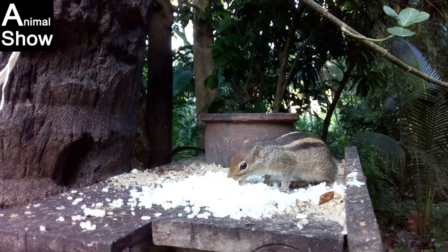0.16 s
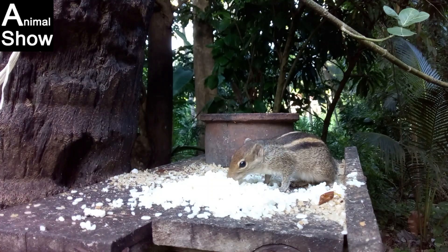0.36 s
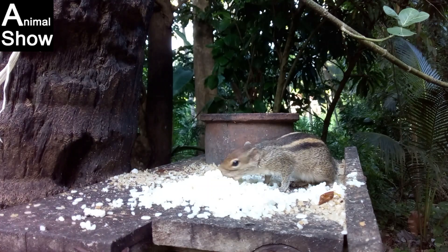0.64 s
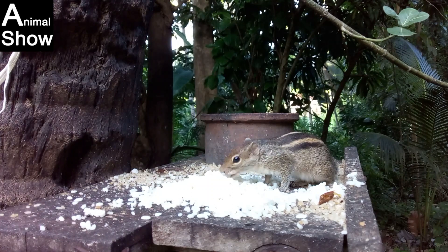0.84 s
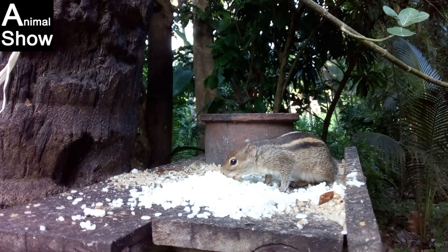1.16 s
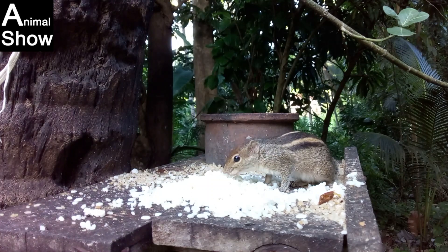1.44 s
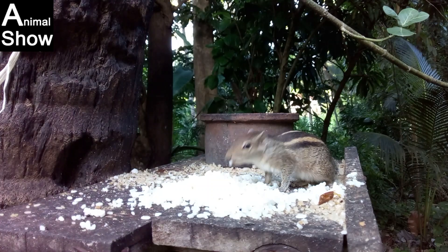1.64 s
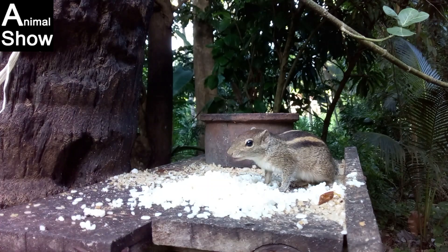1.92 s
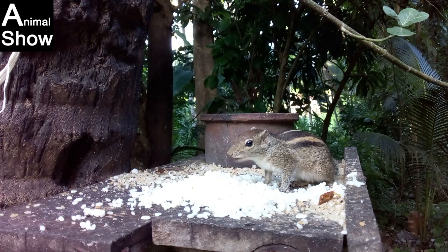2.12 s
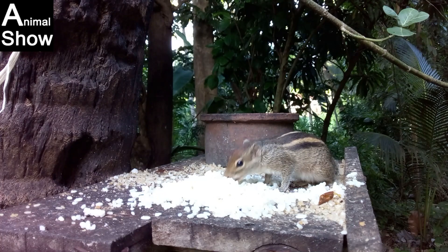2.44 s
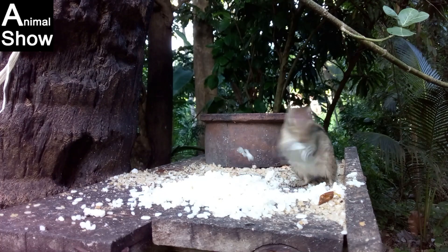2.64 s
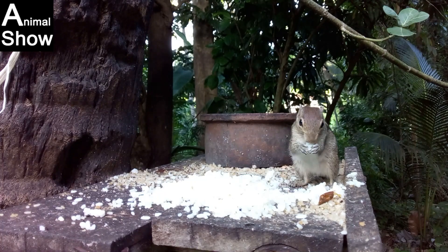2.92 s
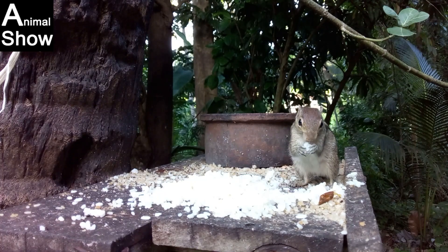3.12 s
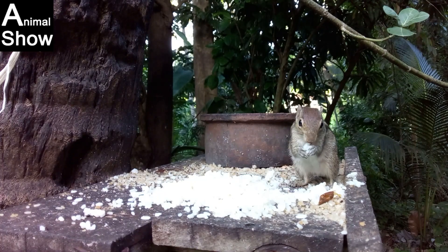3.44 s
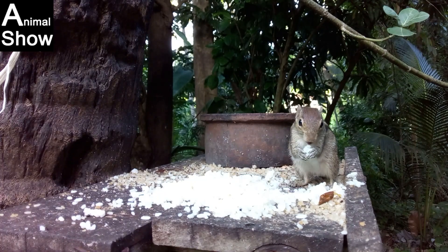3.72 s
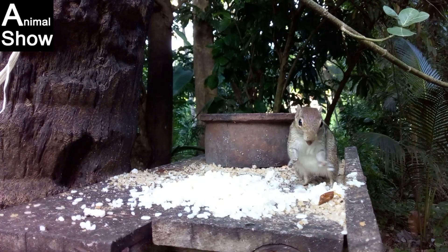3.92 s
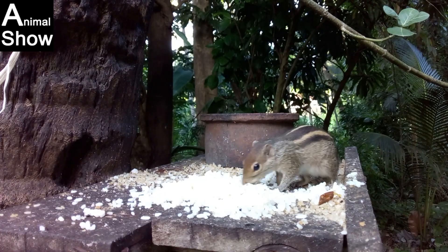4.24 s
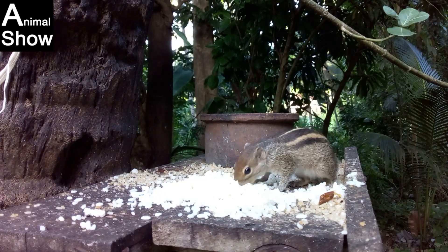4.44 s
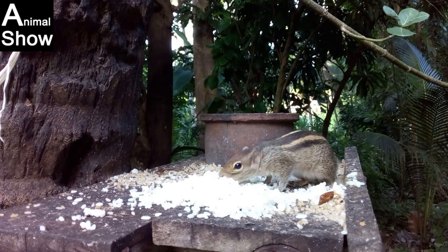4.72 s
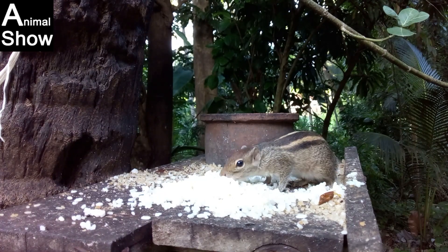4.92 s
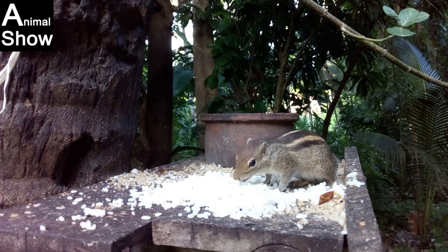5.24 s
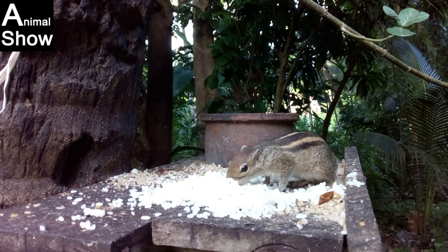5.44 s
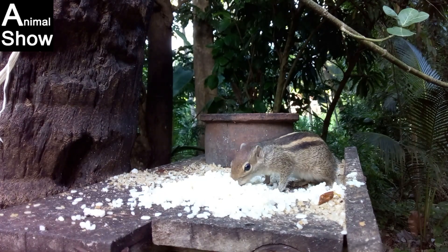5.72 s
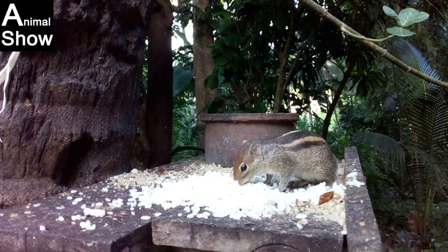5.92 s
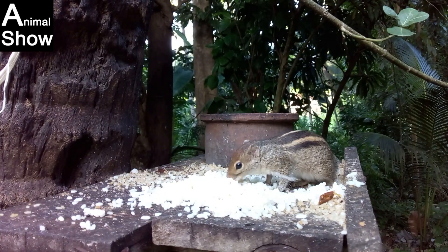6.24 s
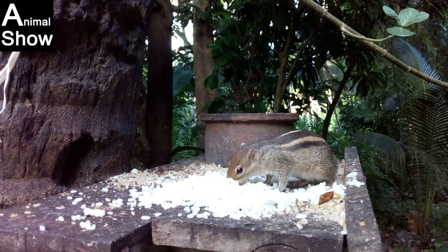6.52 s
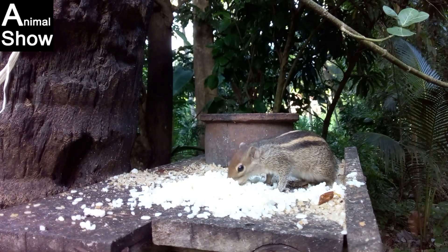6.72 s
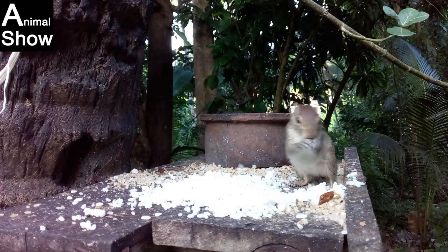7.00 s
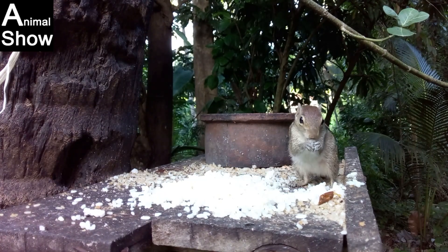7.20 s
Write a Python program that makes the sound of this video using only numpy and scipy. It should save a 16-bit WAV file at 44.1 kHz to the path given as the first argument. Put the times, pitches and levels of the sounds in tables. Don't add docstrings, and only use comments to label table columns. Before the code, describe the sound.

A small squirrel gives sixteen sharp, high chirps at slightly uneven intervals, two or three a second. Each flicks upward roughly into a short clear tone and scatters off ground, trunks and walls. Faint insect shrill, leaf hiss and distant traffic rumble stay underneath. Later come a few tiny claw ticks, weak far bird whistles and, at the end, a hoarse rising bird call. One steady outdoor microphone.

```python
import sys
import numpy as np
from scipy import signal
from scipy.fft import rfft, irfft, next_fast_len
from scipy.io import wavfile
from scipy.ndimage import map_coordinates

SR = 44100
rng = np.random.default_rng(int(sys.argv[2]) if len(sys.argv) > 2 else 0)


def unload_wav(signal):
    wavfile.write(
        sys.argv[1],
        SR,
        np.round(np.clip(np.atleast_2d(signal).T, -1, 1) * 32767).astype(np.int16),
    )


def amplitude_ratio(level_db):
    exponent = np.asarray(level_db, float) / 20
    return 10 ** exponent


N = 325015

# time the tone locks in seconds, pitch in Hz, strength in dB,
# extra level of the second partial in dB, strength of the echoes in dB.
CHIRPS = [(0.148, 2584, 2.7, 2, 0), (0.4806, 2579, 3, 2.8, -0.5), (0.78, 2580, 3, 2, .7),
          (1.0675, 2579, 2.5, 3.4, 0.5), (1.4191, 2585, 3, 2, -0.5), (1.7965, 2577, 2, 1.5, 0),
          (2.2395, 2575, 1, 1.8, 0.4), (2.7876, 2576, 2, -1, -0.5), (3.231, 2571, 1.5, 1.3, -0.7),
          (3.9306, 2573, 1, 1.5, -1.1), (4.3012, 2570, 2, 3.5, -1), (4.6728, 2579, 3, 2, 2.1),
          (5.0791, 2572, 2, 2.5, 1), (5.6631, 2577, 2.6, 1.7, 0.9), (6.2712, 2576, 2, 2, -1.5),
          (6.6388, 2576, 2, 2, 0.7)]
# time from the lock in seconds, pitch in Hz, level in dB.
GLIDE = [(-.02, 895, -74), (-.012, 1103, -57), (-.0085, 1703, -41), (-.006, 1851, -47),
         (-.002, 1940, -41.5), (0, 2579, -37.5), (.003, 2570, -52.5)]
HELD_START_S = -.0015
NEAR_T60_S = .24


def at_hz(points, hz):
    point_hz, point_db = np.array(points).T
    return np.interp(np.log(hz), np.log(point_hz), point_db)


def rms_one(x):
    return x / np.sqrt(np.mean(x ** 2) + 1e-20)


def filtered(x, order, hz, kind="low"):
    return signal.sosfilt(signal.butter(order, hz, kind, fs=SR, output="sos"), x)


def coloured(points):
    size = next_fast_len(N)
    hz = np.maximum(np.arange(size // 2 + 1) * SR / size, 1)
    spectrum = rfft(rng.standard_normal(size)) * amplitude_ratio(at_hz(points, hz))
    return rms_one(irfft(spectrum, size)[:N])


def drift(rate, size):
    points = rng.standard_normal(int(size / SR * 400) + 9)
    return map_coordinates(points, [np.arange(size) * min(rate, 399) / SR], order=3)


def add(out, x, s):
    i = round(s * SR)
    a, b = max(i, 0), min(i + len(x), N)
    out[a:b] += x[a - i:b - i]


def scatter(t60, start_s, length_s):
    t = np.arange(round(length_s * SR)) / SR
    onset = np.clip((t - start_s) / 0.0017 / (1 + 20 * start_s), 0, 1)
    tail = rng.standard_normal(len(t)) * amplitude_ratio(-60 * t / t60) * onset
    tail = signal.lfilter([1], [1, -.4], tail)
    return tail / np.sqrt(np.sum(tail ** 2))


def echoed(x, t60, start_s, length_s):
    return signal.fftconvolve(x, scatter(t60, start_s, length_s))[:len(x)]


def squirrel():
    earlier_chirp = (-.25, 2578, 0, 0, -.5)
    glides, tones, direct = np.zeros((3, N + SR))
    lead = SR // 2
    call = SR // 30
    for s, hz, *levels_db in [earlier_chirp] + CHIRPS:
        rise = amplitude_ratio(levels_db[0]) * glide()
        tone = held(hz, *levels_db)
        i = lead + round((s + GLIDE[0][0]) * SR)
        j = lead + round((s + HELD_START_S) * SR)
        glides[i:i + len(rise)] += rise
        tones[j:j + len(tone)] += tone
        direct[j:j + call] += tone[:call] * signal.windows.tukey(call)
    glides = filtered(glides, 8, 1760, "high")
    highs = amplitude_ratio(-7) * filtered(direct, 8, 7000, "high")
    near = amplitude_ratio(-1.5) * echoed(glides + highs, NEAR_T60_S, 0.0049, 1 / 2)
    uneven = direct * amplitude_ratio(4 * drift(120, size=N + SR))
    far = amplitude_ratio(-30) * echoed(glides + uneven, 1.1, .235, 1)
    far = filtered(far, 1, 3000)
    rasp = amplitude_ratio(-31) * direct * rng.standard_normal(len(direct))
    rasp = filtered(rasp, 2, 4000, "high")
    near = near + .4 * rasp + echoed(rasp, NEAR_T60_S, .002, 1 / 2)
    middle = amplitude_ratio(-8.5) * echoed(glides + rasp, 0.55, 0.031, 1 / 2)
    return (glides + tones + near + middle + far)[lead:lead + N]


def glide():
    # frequency in Hz, level in dB.
    throat = [(800, -14), (1400, -39), (1800, -1), (2600, -0.5), (3600, -15.5), (4500, -12), (5400, -2.5),
              (6500, -57), (9000, -23), (15000, -31)]
    s, hz, level_db = np.transpose(GLIDE)
    t = np.arange(s[0], s[-1], 1 / SR)
    hz, level_db = np.interp(t, s, hz), np.interp(t, s, level_db)
    rough = np.geomspace(1, 0.36, len(t))
    phase = 2 * np.pi * np.cumsum(hz * (1 + 0.019 * drift(311, size=len(t)))) / SR
    flutter = 1 + rough * rng.standard_normal(len(t))
    stack = 0
    for k in range(1, 12):
        audible = k * hz < .4 * SR
        stack = stack + amplitude_ratio(at_hz(throat, k * hz)) * np.sin(k * phase + k * k) * audible
    breath = filtered(flutter * stack - stack, 2, [1800, 6000], "band")
    air = amplitude_ratio(-81) * filtered(rng.standard_normal(len(t)), 2, 7000, "high")
    fade_out = np.clip((s[-1] - t) / 0.0013, 0, 1)
    return amplitude_ratio(level_db) * fade_out * (stack + breath + air)


def held(hz, level_db, bright_db, echo_db):
    # time after the lock in seconds,
    # peak level of the first partial in dB, of the second partial in dB.
    arrivals = [(.003, -36.5, -39.5), (.01, -42.5, -38), (0.015, -53, -32), (.023, -32.5, -40.5),
                (0.035, -35, -44), (0.048, -43.5, -39.5), (0.062, -47.5, -46), (0.08, -44.5, -46.5),
                (0.102, -44, -47.5), (0.123, -44.5, -61.5), (0.149, -62.5, -56), (0.174, -54.5, -62),
                (.196, -68.5, -68), (0.227, -63, -70)]
    # level at the lock in dB, loss in dB per second.
    diffuse = [(-59, 73), (-61.5, 133), (-59, 166), (-60, 149)]
    t = np.arange(HELD_START_S, .33, 1 / SR)
    since_start = t - t[0]
    s, first_db, second_db = np.transpose(arrivals)
    half_width_s = 0.0041 + .032 * s
    returns = np.exp(-.5 * ((t - s[:, None]) / half_width_s[:, None]) ** 2)
    late = np.clip(t / .08, 0, 1)
    attack = np.clip(since_start / 0.0014 / 2, 0, 1) ** 2
    fade_out = np.clip((t[-1] - t) * 20, 0, 1)
    gain = amplitude_ratio(level_db + late * (echo_db - level_db)) * attack * fade_out
    d1, d2, d3, d4 = (amplitude_ratio(start_db - loss_db * t) for start_db, loss_db in diffuse)

    chance = .35 * np.clip(s / .08, .2, 1) * rng.standard_normal((2, len(s)))
    swing = 1.7 * (np.arange(len(s)) % 2) + chance
    p1 = amplitude_ratio(first_db) * np.exp(1j * swing[0]) @ returns + d1 * np.exp(1j)
    p2 = amplitude_ratio(second_db) * np.exp(1j * swing[1]) @ returns + d2 * np.exp(1j)
    p2 = p2 * amplitude_ratio(bright_db * (1 - late / 2))
    high_attack = 1 - np.exp(-since_start / 0.0028)
    d3, d4 = d3 * high_attack, d4 * high_attack
    fast_db = -150 * np.maximum(t - .025, 0)
    partials = [(.485, p2 * amplitude_ratio(-36.5)), (1.0033, p1), (2, p2), (3, d3), (4, d4),
                (5, d3 * amplitude_ratio(-6.5 + fast_db)), (6, d4 * amplitude_ratio(-9 + 2.0 * fast_db))]
    out = 0
    for k, size in partials:
        wobble_db = (.5 + 1.5 * late + 3.5 * (k > 2)) * drift(60, size=len(t))
        slip = (.18 + .55 * late + 1.1 * (k > 2)) * drift(60, size=len(t))
        slip = slip + rng.uniform(0, 2 * np.pi)
        out = out + amplitude_ratio(wobble_db) * np.imag(size * np.exp(1j * (2 * np.pi * k * hz * t + slip)))
    return gain * out


def puffs():
    clicks = np.zeros(N)
    clicks[[round(row[0] * SR) for row in CHIRPS]] = amplitude_ratio(2.0 * rng.standard_normal(len(CHIRPS)))
    t = np.arange(SR // 2) / SR
    swell_and_fade = amplitude_ratio(-60 * t / 0.49) * np.clip(t / 0.056, 0, 1)
    shape = signal.fftconvolve(clicks, swell_and_fade)[:N]
    band = filtered(rng.standard_normal(N), 2, [250, 1600], "band")
    return amplitude_ratio(-57) * shape * rms_one(band)


def birds():
    # start in seconds, length in seconds, first pitch in Hz,
    # last pitch in Hz, level in dB.
    whistles = [(4.445, 0.18, 3440, 3440, -72.5), (4.774, 0.0397, 3890, 4100, -72),
                (4.805, 0.3, 3790, 3770, -70.5), (5.021, 0.21, 3110, 3130, -66.5),
                (5.444, 0.094, 3070, 3150, -70), (3.36, 0.35, 4000, 3420, -76),
                (3.389, .032, 887, 950, -52.5), (4.174, 0.047, 3000, 3000, -76)]
    dry = np.zeros(N)
    for s, length_s, first_hz, last_hz, level_db in whistles:
        t = np.arange(0, length_s, 1 / SR)
        waver = 1 + .016 * drift(217, size=SR)[:len(t)]
        phase = 2 * np.pi * np.cumsum(np.linspace(first_hz, last_hz, len(t)) * waver) / SR
        fading = amplitude_ratio(level_db - 25 * t) * signal.windows.tukey(len(t), .3)
        add(dry, fading * np.sin(phase), s)
    add_hoarse_bird(dry)
    grove = signal.fftconvolve(filtered(dry, 6, 1250, "high"), scatter(0.59, 0.0046, 1 / 2))[:N]
    return dry / 2 + amplitude_ratio(1.5) * grove


def add_hoarse_bird(dry):
    from_hz, to_hz, ease_s = 3780, 4580, 0.22
    t = np.arange(SR // 2) / SR
    third_hz = to_hz - (to_hz - from_hz) * np.exp(-t / ease_s)
    phase = 2 * np.pi * np.cumsum(third_hz) / SR / 3
    buzz = 1 + 0.84 * np.sin(2 * np.pi * 110 * t + 0.53 * drift(25, size=len(t)))
    swell = 1 - np.exp(-t / 0.037)
    # partial, level in dB, chance wandering of its phase in radians
    for k, level_db, hoarse in [(3, -70, .75), (2, -86.5, 1.2), (1.07, -78.5, 2.2)]:
        voice = np.sin(k * phase + hoarse * drift(250, size=len(t)))
        add(dry, amplitude_ratio(level_db) * swell * buzz * voice, 6.99)


def insects():
    # wing pitch in Hz, width in Hz, strokes per second, stroke depth in dB, level in dB.
    wings = [
        (6824, 450, 61, 2.5, -66.5),
        (9795, 680, 128.4, 8.5, -72),
        (9110, 700, 128.4, 0, -73.5),
        (5230, 880, 34, 3, -87),
    ]
    # middle in seconds, half length in seconds, rise in dB.
    swells = [(0, .2, 15), (2.6, .17, 11), (5.45, .25, 12)]
    out, t = 0, np.arange(N) / SR
    for hz, width_hz, per_s, depth_db, level_db in wings:
        r = np.exp(-np.pi * width_hz / SR)
        wing = [1, 0, -1, 1, -2 * r * np.cos(2 * np.pi * hz / SR), r * r]
        throb_db = depth_db * np.sin(2 * np.pi * per_s * t + .4 * drift(3, size=N))
        throb_db = throb_db + drift(1.5, size=N)
        if hz < 6000:
            for s, half_s, db in swells:
                throb_db = throb_db * 1
                level_db = level_db + db * np.exp(-((t - s) / half_s) ** 2)
        shrill = signal.sosfilt([wing, wing], rng.standard_normal(N) * amplitude_ratio(throb_db))
        out = out + amplitude_ratio(level_db) * rms_one(shrill)
    return out


def claws():
    # time in seconds, peak level in dB, middle pitch in Hz.
    ticks = [(2.887, -58, 7000), (2.9024, -51, 12000), (5.802, -58, 6500), (6.102, -57, 13100),
             (6.156, -55, 6640)]
    out, t = np.zeros(N), np.arange(200) / SR
    for s, peak_db, hz in ticks:
        burst = rng.standard_normal(len(t)) * amplitude_ratio(-60 * t / .004)
        add(out, amplitude_ratio(peak_db) * filtered(burst, 1, [.7 * hz, min(1.3 * hz, 18000)], "band"), s)
    return out


def background():
    # time in seconds, level in dB.
    traffic = [(0.0, -57.5), (0.92, -56.5), (3.14, -58.5), (3.35, -55), (3.84, -61), (4.1, -57),
               (6.71, -59), (6.81, -60.5), (7.37, -57)]
    # frequency in Hz, level in dB per Hz.
    rumble_colour = [(12, -45), (20, -23), (44, -1.5), (65, 2.5), (132, -6.5), (178, -12), (289, -9),
                     (450, -14.5), (580, -34), (990, -120)]
    # frequency in Hz, level in dB per Hz.
    murmur_colour = [(15, -52.5), (25, -31.5), (59, -50), (92, -2.5), (135, 2.5), (178, -21.5), (226, -17),
                     (261, -13.5), (421, -16.5), (544, -18.5), (1220, -32.5), (1310, -33), (2000, -35),
                     (2600, -70), (4400, -120)]
    # frequency in Hz, level in dB per Hz.
    hiss_colour = [(1000, -13), (2000, 1), (3500, 1), (6000, -1), (8000, -7.5), (11000, -3.5), (13000, -6),
                   (16000, -7.5)]
    busy_db = np.interp(np.arange(N) / SR, *np.transpose(traffic))
    low = filtered(coloured(rumble_colour), 2, 320)
    upper = filtered(coloured(murmur_colour), 2, 320, "high")
    rumble_db = -0.28 + busy_db + 0.56 * drift(4.5, size=N)
    murmur_db = -63 + 0.65 * (busy_db - busy_db.mean()) + 0.65 * drift(2.85, size=N)
    hiss_db = -71.5 + 1.4 * drift(0.69, size=N)
    hiss = amplitude_ratio(hiss_db) * coloured([(300, -35.0)] + hiss_colour)
    return amplitude_ratio(rumble_db) * rms_one(low) + amplitude_ratio(murmur_db) * rms_one(upper) + hiss


def scene():
    return (squirrel() + puffs() + birds() + insects() + claws() + background())[None]


def roll_off(x):
    return signal.sosfilt(signal.butter(12, 15710, fs=SR, output="sos"), x)


def record(dry):
    no_bass = filtered(dry, 2, 38, "high")
    mix = signal.sosfilt(signal.ellip(12, .5, 60, 15700, fs=SR, output="sos"), no_bass)
    return roll_off(mix)


dry = scene()
out = record(dry)
unload_wav(out)
```